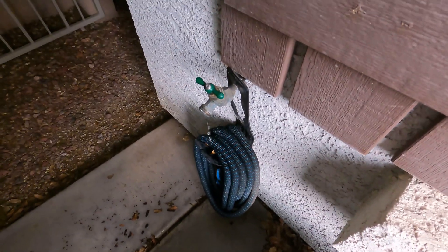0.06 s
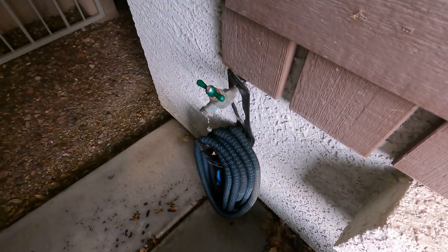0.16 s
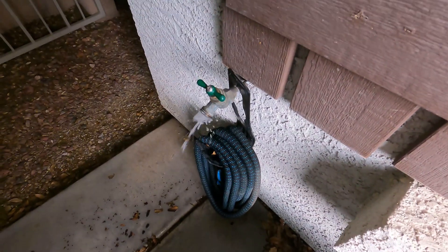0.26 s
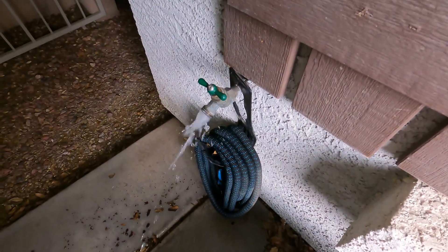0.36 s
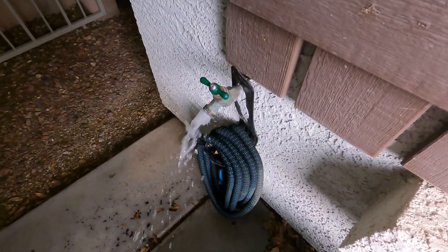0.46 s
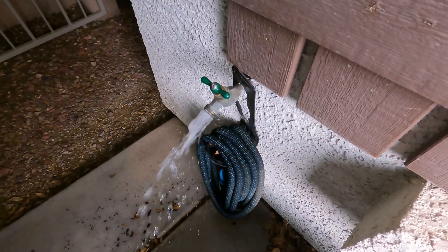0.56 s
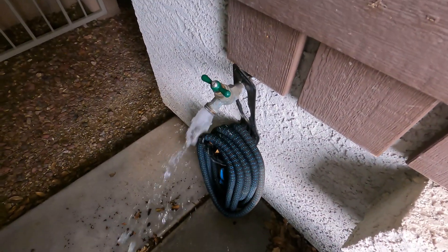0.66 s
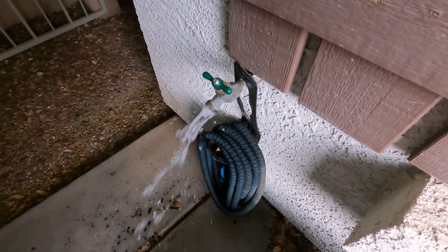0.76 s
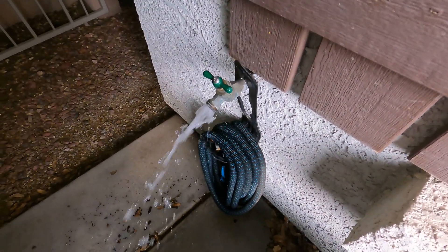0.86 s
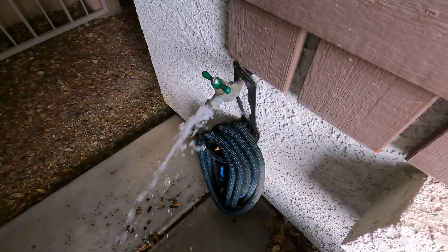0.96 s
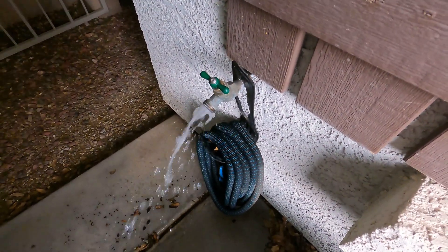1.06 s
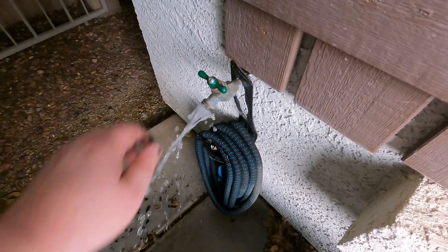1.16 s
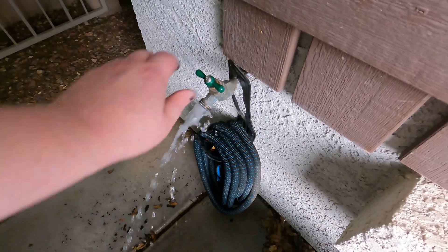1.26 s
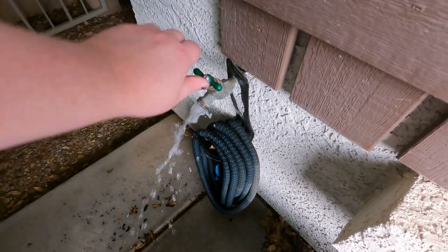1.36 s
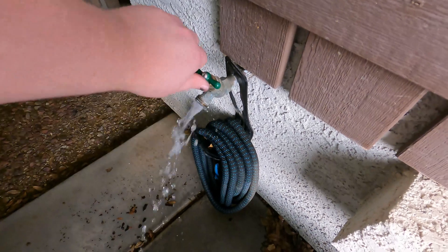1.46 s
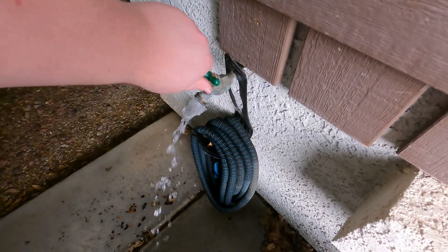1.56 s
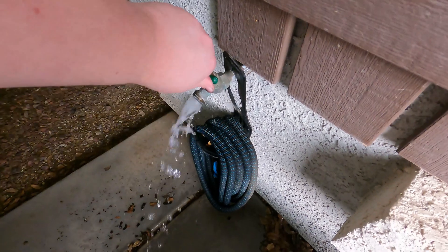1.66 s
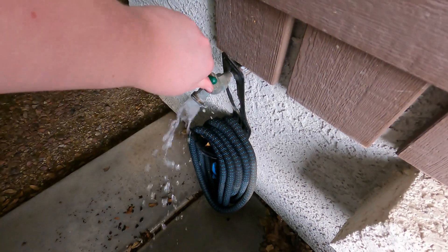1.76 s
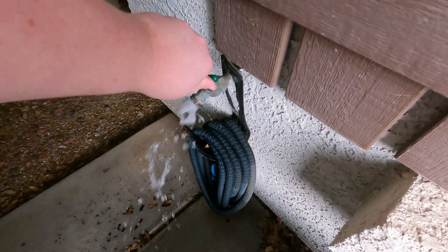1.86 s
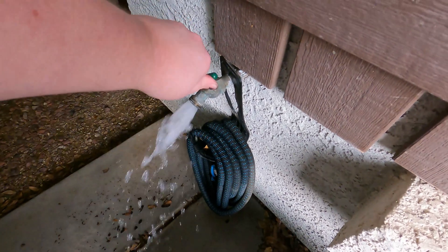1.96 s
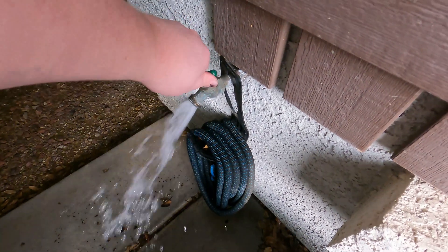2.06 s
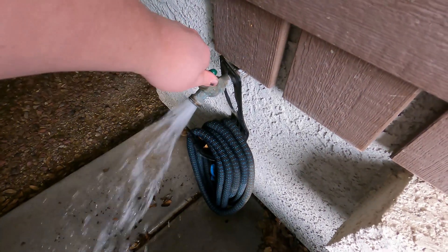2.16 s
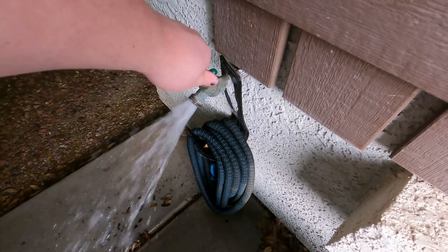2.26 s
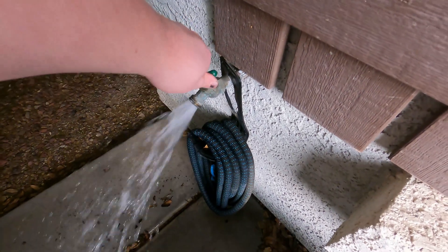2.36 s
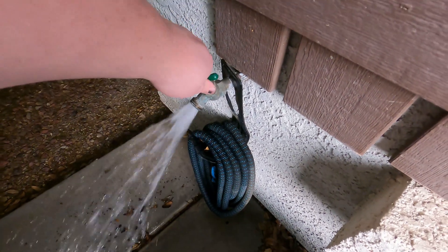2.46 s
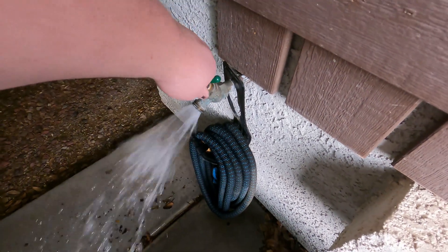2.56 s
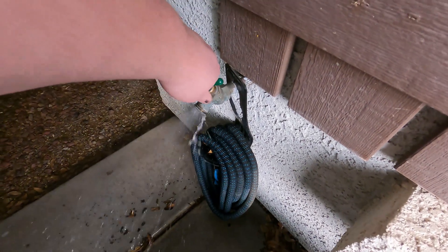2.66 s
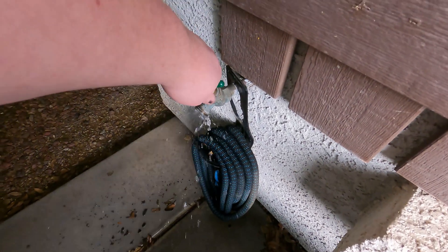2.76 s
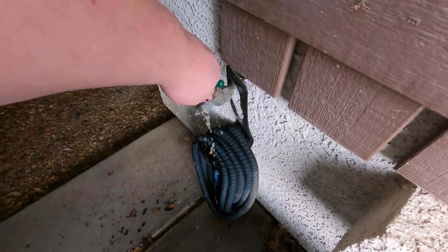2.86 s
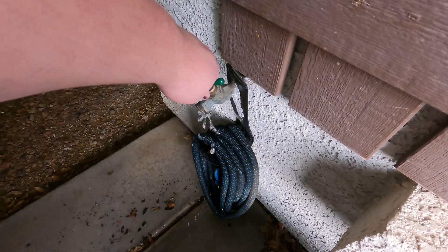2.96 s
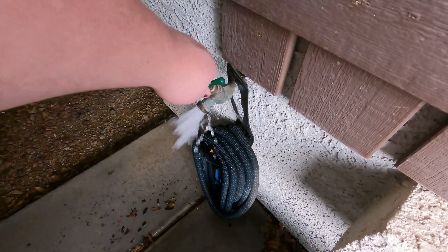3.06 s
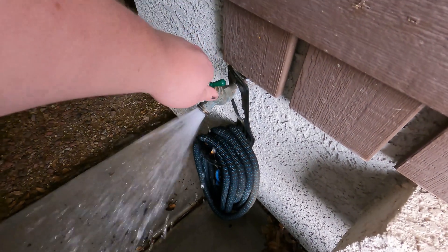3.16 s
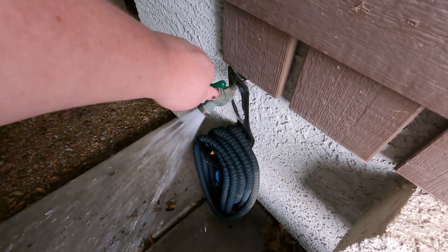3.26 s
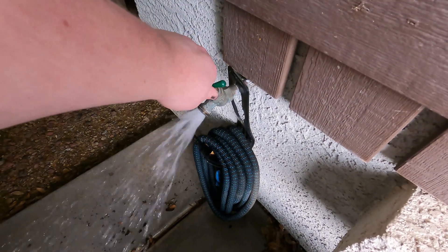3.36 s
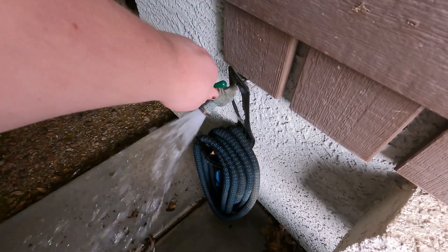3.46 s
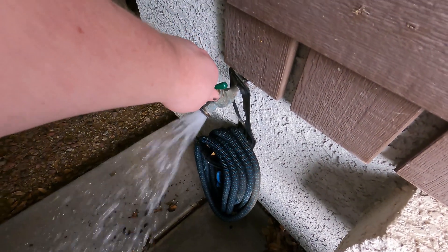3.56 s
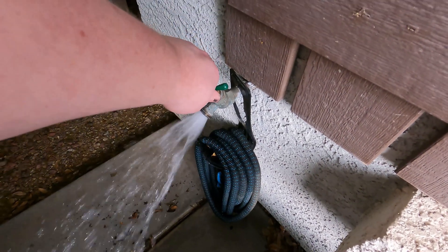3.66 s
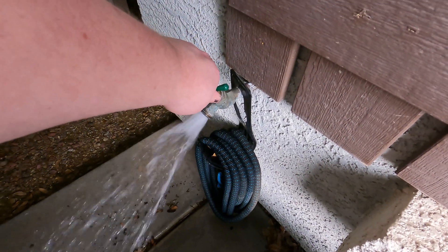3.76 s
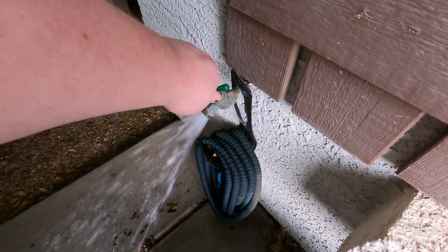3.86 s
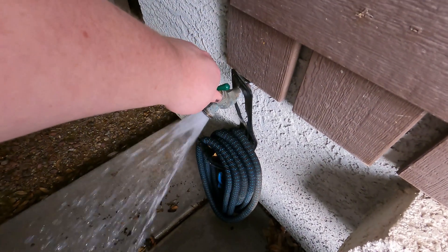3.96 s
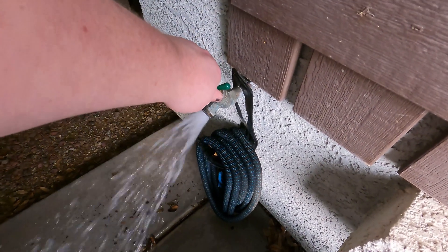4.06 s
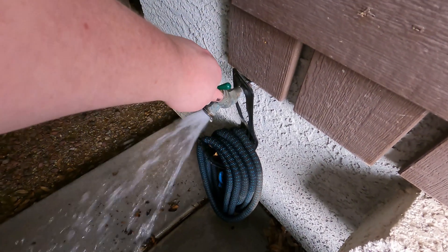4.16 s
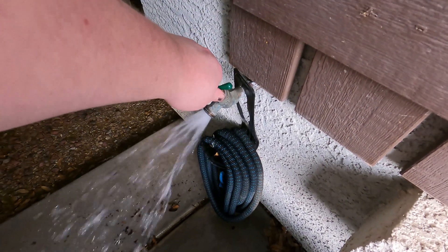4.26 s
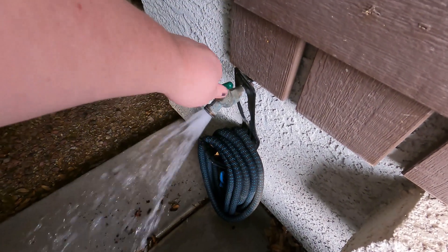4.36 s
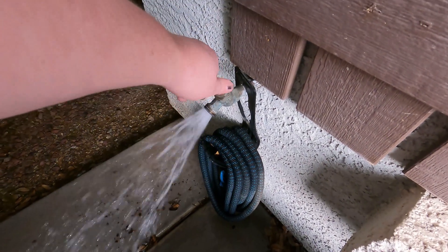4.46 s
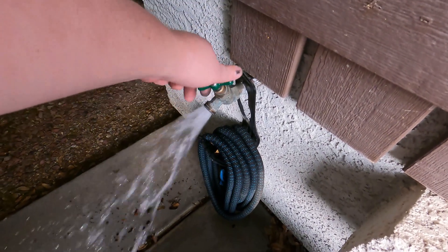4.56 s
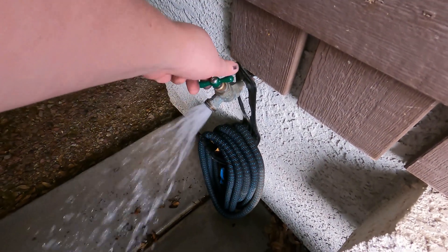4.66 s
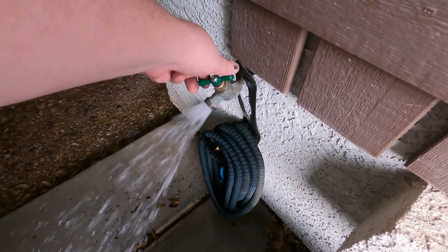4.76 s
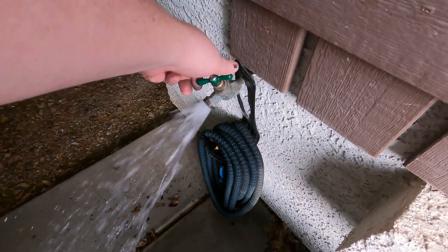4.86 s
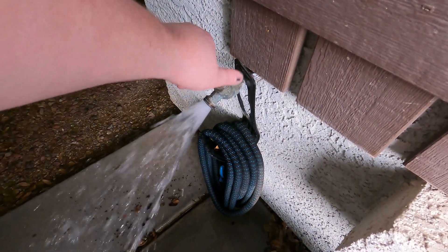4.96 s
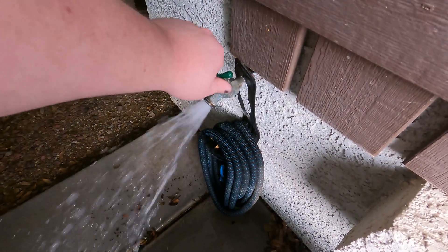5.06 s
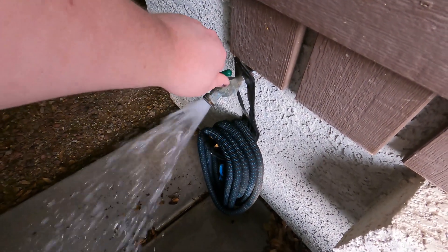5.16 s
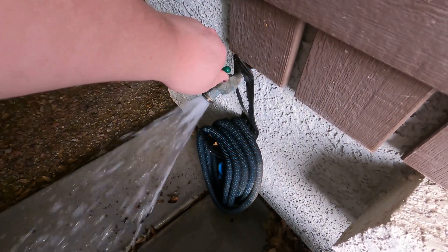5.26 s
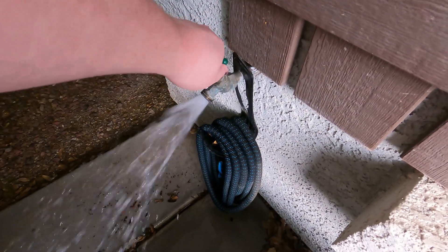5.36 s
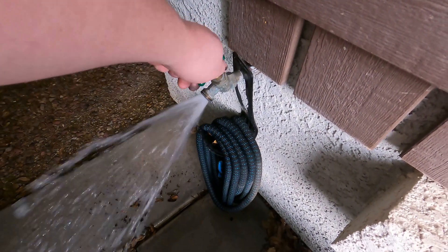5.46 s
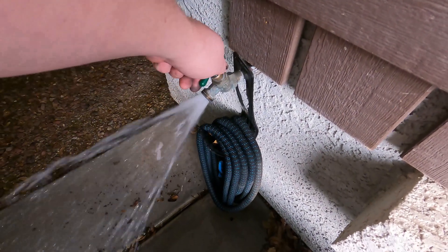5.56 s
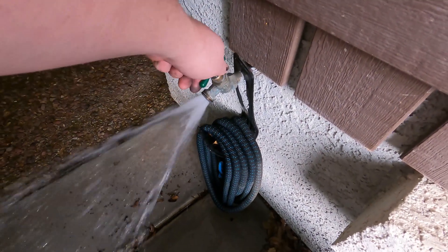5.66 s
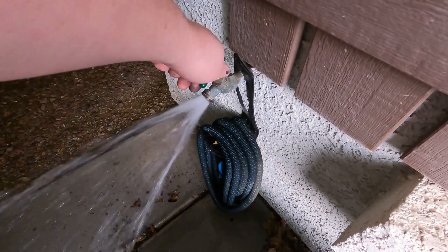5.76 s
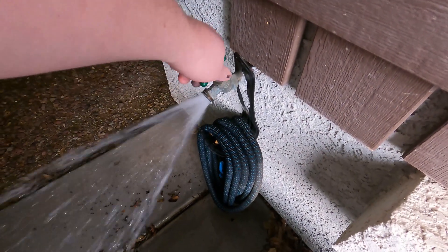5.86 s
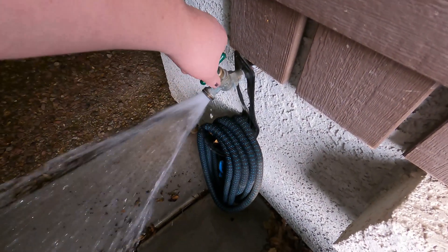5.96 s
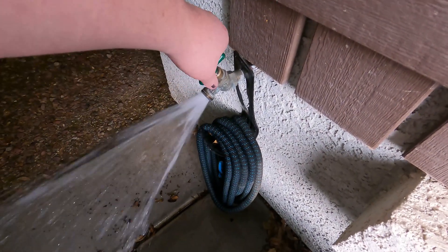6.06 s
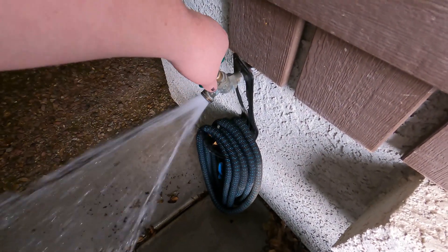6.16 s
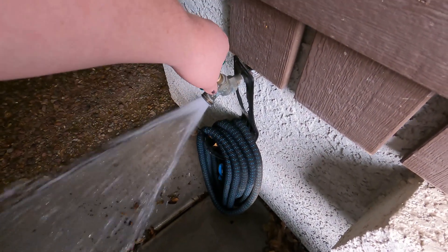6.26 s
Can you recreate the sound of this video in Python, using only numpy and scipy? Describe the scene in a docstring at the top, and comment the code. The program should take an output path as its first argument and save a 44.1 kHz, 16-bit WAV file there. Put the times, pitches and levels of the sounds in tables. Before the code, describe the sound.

An outdoor spigot hisses air, spits and pops water onto concrete, gushes, sputters once more, then settles into a strong splashing jet.

```python
"""Water from an outdoor hose spigot dribbles, gushes and then jets into a corner of stucco walls.
Its crackle is filtered noise in tiny puffs with ringing bubbles; drops patter on the slab after their flight.
Air still in the pipe hisses and sputters out in two blasts, before the dribble and again after the gush.
Between them air pockets pop, slugs of water glug and thud, and big drops slap the concrete.
The corner adds resonances and short stereo echoes; a low outdoor rumble lies underneath."""
import sys
import numpy as np
from scipy import signal
from scipy.fft import rfft, irfft
from scipy.io import wavfile
from scipy.ndimage import uniform_filter1d

SR = 44100
rng = np.random.default_rng(int(sys.argv[2]) if len(sys.argv) > 2 else 0)


def transcribe(u):
    """Save the signal u as a 16-bit wav file named by the first command-line argument.

    u: samples, shape (n,) or (channels, n), limited to [-1, 1]; the rate is SR.
    q: integer samples, one column per channel.
    """
    v = np.clip(np.atleast_2d(u).T, -1, 1)
    q = np.round(v * 32767).astype(np.int16)
    wavfile.write(sys.argv[1], SR, q)


N = 278843
TIME = np.arange(N) / SR
GRID_HZ = np.maximum(np.fft.rfftfreq(4096, 1 / SR), 1)   # frequencies at which filters are drawn


def from_db(db):
    """Turn decibels into a gain."""
    return 10 ** (np.asarray(db) / 20)


def rms_one(x):
    """Scale a sound to an average (rms) level of 1."""
    return x / np.sqrt(np.mean(x ** 2) + 1e-20)


def over(sound, length_s):
    """Scale a short sound to the energy of rms 1 held for this length."""
    return sound / np.sqrt(np.sum(sound ** 2) / (length_s * SR))


def in_time(rows):
    """Read the columns of a time table at every sample, with straight lines between rows."""
    start_s, *columns = np.transpose(rows)
    return np.array([np.interp(TIME, start_s, column) for column in columns])


def stretch(rows, rise_s, fall_s):
    """Gains of a dB curve that fades in before its first row and out after its last."""
    before = np.maximum(rows[0][0] - TIME, 0) / rise_s
    after = np.maximum(TIME - rows[-1][0], 0) / fall_s
    return from_db(in_time(rows)) * np.exp(-(before + after))


def shape(points):
    """Draw a spectrum in dB from a few (pitch_hz, level_db) points."""
    hz, db = np.transpose(points)
    return np.interp(np.log(GRID_HZ), np.log(hz), db)


def bumps(rows):
    """Draw resonant peaks and dips in dB from rows of (pitch_hz, width_hz, level_db)."""
    return sum(db / (1 + ((GRID_HZ - hz) / width) ** 2) ** 2 for hz, width, db in rows)


def colour(x, db):
    """Filter a sound with the given dB response, never ringing ahead of it (minimum phase)."""
    cepstrum = irfft(np.log(from_db(db)))
    half = len(cepstrum) // 2
    # fold the backward half onto the forward half
    cepstrum[1:half] *= 2
    cepstrum[half + 1:] = 0
    impulse = irfft(np.exp(rfft(cepstrum)))
    return signal.oaconvolve(x, impulse)[:len(x)]


def drift(rate_hz):
    """Slow random wandering with rms 1: noise smoothed twice, made at every 40th sample."""
    r = np.exp(-2 * np.pi * rate_hz * 40 / SR)
    noise = rng.standard_normal(N // 40 + 2002)
    slow = signal.lfilter([1], [1, -2 * r, r * r], noise)[2000:]
    return np.interp(np.arange(N) / 40, np.arange(len(slow)), rms_one(slow))


def grains(per_s, spread_db, clump_db, smooth):
    """Random clicks of uneven size, in clumps, over fine noise; the mean level is held steady."""
    born = rng.random(N) < per_s / SR
    sizes = from_db(spread_db * np.minimum(rng.exponential(1, N), 3.7)) * rng.choice([-1, 1], N)
    clicks = rms_one(born * sizes / np.sqrt(per_s)) + smooth * rng.standard_normal(N)
    clicks = clicks * from_db(clump_db * drift(41))
    return clicks / np.sqrt(uniform_filter1d(clicks ** 2, size=4000) + 1e-9)


def puffs(clicks, swell_s):
    """Each click becomes a tiny puff of noise that swells and fades."""
    t = np.arange(-256, 257) / SR
    power = signal.oaconvolve(clicks ** 2, np.exp(-(t / swell_s) ** 2), "same")
    return np.sqrt(np.abs(power)) * rng.standard_normal(N)


def add(track, start_s, sound):
    """Mix a sound into the track at its start time."""
    i = max(int(start_s * SR), 0)
    track[i:i + len(sound)] += sound[:N - i]


# how far scattered sound differs between the two sides: pitch_hz, side_minus_mid_db
WIDTH = [(100, -22.5), (1000, -13.5), (2600, -14), (5000, -13), (8000, -4.5), (13000, -4.5)]


def wide(x, db):
    """A coloured stereo source: both sides share each grain's timing, but not its fine detail."""
    mid = colour(x, db)
    loudness = np.sqrt(np.abs(uniform_filter1d(x ** 2, size=48)))
    side = colour(loudness * rng.standard_normal(N), db + shape(WIDTH))
    return (mid + side * [[1], [-1]]) / np.sqrt(np.mean(mid ** 2))


# tone of the outdoor rumble: pitch_hz, relative_level_db
RUMBLE_TONE = [(15, -25), (30, -25), (48, 0), (59, 2.5), (72, 1.5), (100, 0), (150, -10.5), (300, -21),
               (900, -19), (4000, -64)]
# loudness of the outdoor rumble: start_s, level_db
RUMBLE_LEVEL = [(0, -34.5), (1.2, -39.5), (3, -37), (3.6, -45.5), (6.3, -43.5)]


def outdoor_rumble():
    """Noise filtered down to the deep bass, with a slowly changing level."""
    return from_db(in_time(RUMBLE_LEVEL)) * wide(rng.standard_normal(N), shape(RUMBLE_TONE))


# peaks and dips of the wall corner: pitch_hz, width_hz, level_db
CORNER = [(138, 15, 2), (267, 43, -5.5), (314, 19, 0.5), (390, 16, 0.5), (495, 89, -6), (648, 86, 4),
          (822, 118, -11.5), (932, 38, 7), (1225, 22, 4), (1269, 34, 6.5), (1390, 23, 5), (1344, 6.2, 10.5),
          (1560, 24, 7), (1645, 41, -2), (1750, 57, 1), (1930, 12, 5), (2040, 35, -9.5), (2293, 18, 5),
          (2630, 110, -4), (2727, 86, 2.5), (3130, 32, 2.5), (3320, 26, -13), (3782, 61, 6), (3950, 45, -4),
          (4510, 71, 6.5)]
# the left side is a little brighter: pitch_hz, left_minus_right_db
BALANCE = [(300, -0.5), (1000, 0.8), (2500, 0), (5000, 1.5), (8500, 3.5), (13000, 0.7)]
# sound scattered back by walls and slab, relative to the direct sound: pitch_hz, level_db
REFLECTED = [(100, -16), (700, -14), (2000, -11), (4500, -12), (8000, -13), (15000, -14)]


def corner(stereo):
    """Close walls colour the sound and scatter it back differently to each side."""
    t, sides = TIME[:12000], []
    near_t60_s, far_t60_s, far_db = .035, .2, -16   # t60: time to fade by 60 dB
    decay = from_db(-60 * t / near_t60_s) + from_db(far_db - 60 * t / far_t60_s)
    decay = decay * (t > .0007)   # the first echoes come just after the direct sound
    for x, sign in zip(stereo, (1, -1)):
        direct = colour(x, bumps(CORNER) + sign * shape(BALANCE) / 2)
        echoes = rng.standard_normal(len(t)) * decay
        echoes = echoes / np.linalg.norm(echoes)
        reflected = signal.oaconvolve(colour(direct, shape(REFLECTED)), echoes)[:N]
        sides.append(direct + reflected)
    return np.array(sides)


# big drops slapping the concrete: start_s, relative_level_db
SLAPS = [(0.7667, -17), (0.8714, -12), (0.9268, -18.5), (0.9816, -17), (1.0714, -17), (1.2032, -14),
         (1.2415, -12.5), (1.2544, -13.5), (1.272, -14), (1.3204, -23), (1.3293, -15), (1.5584, -19),
         (1.5798, -17.5), (1.5948, -16), (1.6137, -15.5), (1.7399, -13), (1.7823, -18), (1.8282, -19),
         (2.0123, -14)]
# tone of a slap: pitch_hz, relative_level_db
SLAP_TONE = [(300, -24), (1800, -14), (2600, -3), (4500, 0), (7300, -2), (9000, -14), (12000, -23),
             (15000, -44)]


def slaps():
    """A drop lands with a sharp crack and a small splash, both fading bursts of noise."""
    out, t = np.zeros(N), TIME[:2048]
    crack_s, splash_s, splash_db = .0007, .005, -8   # fading times; splash relative to crack
    envelope = np.exp(-t / crack_s) + from_db(splash_db) * np.exp(-t / splash_s)
    for start_s, db in SLAPS:
        slap = colour(rng.standard_normal(len(t)) * envelope, shape(SLAP_TONE))
        add(out, start_s, from_db(db + 0.5) * over(slap, crack_s))
    return out


def glug(length_s, hz, sharpness=3.5, skirt_db=-17, top_hz=1700):
    """A rough burst of flow drives a damped cavity, which rings around one pitch."""
    t = TIME[:8192]
    flow = rng.standard_normal(len(t)) * np.exp(-(t / length_s) ** 2) * np.sqrt(t / length_s)
    cavity = 1 / (1 + (sharpness * (GRID_HZ / hz - hz / GRID_HZ)) ** 2) + from_db(skirt_db) ** 2
    band = 1 / (1 + (GRID_HZ / top_hz) ** 6) / (1 + (80 / GRID_HZ) ** 4)   # cuts treble and deepest bass
    return over(colour(flow, 10 * np.log10(cavity * band)), length_s)


# heavy slugs of water forced through the valve:
# start_s, length_s, relative_thud_db, relative_knock_db
SLUGS = [(0.29, 0.022, -16.5, -23), (0.384, 0.029, -26.5, -31), (0.63, 0.043, -19, -29.5),
         (.678, 0.0049, -31, -12), (1.482, 0.029, -30, -32.5), (1.854, 0.07, -23, -44),
         (1.894, 0.0096, -23, -16.5), (2.059, 0.0088, -16.5, -27), (2.642, 0.027, -17, -22.5),
         (3.163, 0.058, -22.5, -40)]


def slugs():
    """Every heavy slug drives two cavities: a low one thuds and a higher one knocks."""
    out = np.zeros(N)
    thud_hz, knock_hz, trim_db = 260, 1230, -3.5
    for start_s, length_s, thud_db, knock_db in SLUGS:
        thud = from_db(thud_db + trim_db) * glug(length_s, thud_hz, sharpness=0.5)
        knock = from_db(knock_db + trim_db) * glug(length_s, knock_hz)
        add(out, start_s, thud + knock)
    return out


# air pockets spit out of the spout: start_s, relative_pop_db, ring_hz, glug_db
SPITS = [(0.3882, -9.5, 2920, -31.5), (0.4374, -11.5, 2320, -30), (0.494, -10.5, 2760, -31.5),
         (0.5117, -10.5, 2470, -32), (0.5614, -10, 2400, -27), (0.5824, -12, 2170, -29),
         (0.5983, -11.5, 2400, -46), (0.6287, -10, 3050, -39), (0.664, -6.5, 2580, -36),
         (0.8051, -6, 3120, -28), (0.8824, -5, 2550, -41), (0.9824, -13, 2200, -31),
         (1.0647, -9, 2100, -34), (1.1418, -12.5, 2470, -38.5), (1.265, -13.5, 2430, -32),
         (1.3649, -12, 2540, -28.5), (1.3838, -20, 2430, -31.5), (1.473, -12, 2410, -30.5),
         (1.4957, -13.5, 2700, -34), (1.6462, -10, 2440, -32.5), (1.7383, -24, 2740, -34),
         (1.871, -9, 2800, -25.5), (1.8985, -4.5, 2080, -30), (1.9527, -9.5, 2940, -31.5),
         (2.0735, -9, 2840, -44), (2.1313, -8.5, 2950, -33), (3.0444, -11, 3150, -48),
         (3.2564, -9.5, 2890, -42)]


def closing_glugs():
    """Water closes behind every spit with a small glug."""
    out = np.zeros(N)
    for start_s, _, _, glug_db in SPITS:
        add(out, start_s, from_db(glug_db) * glug(length_s=0.022, hz=293))
    return out


def plops():
    """The big bubble left by a spit rings for some cycles and rises a little in pitch."""
    out, t = np.zeros(N), TIME[:8192]
    delay_s, t60_s, middle_hz = 0.01474, 0.17, 202
    rise_per_s = .8   # share of the starting pitch
    for (start_s, _, _, glug_db), size in zip(SPITS, rng.standard_normal(len(SPITS))):
        hz = middle_hz * np.exp(-0.11 * size)   # larger bubbles are lower
        fade = (1 - np.exp(-t / 0.001)) * from_db(glug_db + 2 - 60 * t / t60_s)
        add(out, start_s + delay_s, fade * np.sin(2 * np.pi * hz * t * (1 + rise_per_s * t / 2)))
    return out


# tone of a pop before its ring is added: pitch_hz, relative_level_db
POP_TONE = [(200, -22), (900, -17), (1800, -15), (2250, -2), (3200, 0), (4200, -5), (6000, -11),
            (8000, -24), (11000, -39), (15000, -58)]


def pops():
    """Each air pocket bursts in a short puff that rings the spout and trails off in fizz."""
    out, t = np.zeros(N), TIME[:4096]
    puff_s = .0035
    swell = np.exp(-(2 * t / puff_s - 1) ** 2 / 2)
    fizz = from_db(-15) * np.exp(-t / .008)
    softer_treble_db = -3 / (1 + (4000 / GRID_HZ) ** 8)
    for start_s, db, ring_hz, _ in SPITS:
        response = shape(POP_TONE) + bumps([(ring_hz, 470, 10)]) + softer_treble_db
        smaller_delay_s, smaller_db = rng.uniform(.0035, .0084), -10.5   # a smaller pocket follows
        for delay_s, pocket_db in [(0, 0), (smaller_delay_s, smaller_db)]:
            pop = colour(rng.standard_normal(len(t)) * (swell + fizz), response)
            add(out, start_s + delay_s, from_db(db + pocket_db - 5.5) * over(pop, puff_s))
    return out


def sputter(cavity, climb):
    """Air blows through a cavity in the water; its ring climbs as it narrows and drops as it bursts open."""
    gulps_per_s = 24 * from_db(3 * drift(13))   # the pace wanders
    closing = np.cumsum(gulps_per_s) / SR % 1   # rises from 0 to 1 in every gulp
    ring_hz = in_time(cavity)[0] * (1 + climb * (closing - .5) + .03 * drift(35.3))
    phase = 2 * np.pi * np.cumsum(ring_hz) / SR
    # slow noise makes the ring and its overtone unsteady
    narrow = signal.butter(2, 230, fs=SR, output="sos")
    noise = rng.standard_normal((2, N)) + 1j * rng.standard_normal((2, N))
    swing = signal.sosfilt(narrow, noise)
    ring = swing[0] * np.exp(1j * phase) + from_db(-15) * swing[1] * np.exp(2j * phase)
    return rms_one(ring.real * from_db(1.4 * drift(53)))


# resonances of the air-filled spout: pitch_hz, width_hz, level_db
SPOUT = [(1760, 150, 2.4), (3750, 110, 3.5), (4200, 100, 2), (5900, 200, 3.5), (6700, 160, 2.6),
         (11950, 250, 3)]
# tone of the low churning of the water: pitch_hz, relative_level_db
CHURN = [(60, -44), (130, -1.5), (200, 5), (380, 2), (650, 1.5), (900, -16), (2000, -53), (5000, -69)]


def air(blast, tone, cavity, hiss_flutter_db, climb):
    """Trapped air rushes through the resonances of the spout and drags water with it."""
    hiss, spit = stretch(blast, rise_s=0.0073, fall_s=0.016)
    ring = sputter(cavity, climb)
    gurgle = rms_one(colour(grains(600, spread_db=2.0, clump_db=2.5, smooth=.3), shape(CHURN)))
    noise = rng.standard_normal(N) * from_db(hiss_flutter_db * drift(39))
    rush = wide(noise, shape(tone) + bumps(SPOUT))
    return hiss * rush + spit * (ring + from_db(-11) * gurgle)


# escaping air, with the sputter of water it carries along: start_s, hiss_db, sputter_db
FIRST_AIR = [(0, -21, -32), (.28, -22, -42), (.305, -20.5, -17), (.345, -23, -15.5)]
SECOND_AIR = [(2.66, -21, -14.5), (2.71, -18, -17.5), (2.78, -18.5, -19.5), (3.075, -19.5, -27.5),
              (3.105, -20.5, -15)]
# tone of the hiss before the spout resonances: pitch_hz, relative_level_db
FIRST_RUSH = [(300, -20), (800, -13.5), (1250, -12), (1750, -1), (2200, -4.5), (2900, 2.5), (3400, -4),
              (4100, -1), (5100, -11.5), (6000, -9), (6800, -9), (8000, -17), (10800, -25.5),
              (12100, -21.5), (13000, -27), (15500, -39)]
SECOND_RUSH = [(300, -31), (800, -5.5), (1250, -3), (1900, -3.5), (2400, 5.5), (3800, 1.5), (5100, -3),
               (6000, -1.5), (6900, -6), (8000, -14.5), (10300, -21), (11900, -16), (13300, -27),
               (15500, -51)]
# middle pitch of the cavity that air opens in the wet spout: start_s, ring_hz
FIRST_CAVITY = [(.3, 3170), (0.349, 2876)]
SECOND_CAVITY = [(2.66, 2810), (2.786, 3170), (2.862, 3110), (2.894, 2904), (2.978, 3466), (3.016, 3000),
                 (3.064, 3160), (3.11, 2847)]


def air_blasts():
    """Air escapes twice; the pitch of the second sputter climbs further in each gulp."""
    first = air(FIRST_AIR, FIRST_RUSH, FIRST_CAVITY, hiss_flutter_db=0.55, climb=0.053)
    second = air(SECOND_AIR, SECOND_RUSH, SECOND_CAVITY, hiss_flutter_db=.9, climb=.28)
    return first + second


# tone of drops landing on the slab: pitch_hz, relative_level_db
SPRAY = [(700, -12), (2000, 12.5), (3500, -9.5), (4600, -2), (5500, 0), (7000, -1.5), (8300, -7.5),
         (10000, -12), (12200, -15), (13500, -16), (15500, -63)]


def patter(per_s):
    """Drops of four sizes land independently; smaller ones tick brighter, the smallest almost as mist."""
    out = 0
    for hz, mist in [(3600, .3), (5200, .25), (7200, .3), (10500, .7)]:
        size_band = 10 * np.log10(.01 + np.exp(-(np.log2(GRID_HZ / hz) / .32) ** 2))
        db = shape(SPRAY) + size_band
        share = np.sqrt(np.sum(from_db(db) ** 2) / np.sum(from_db(shape(SPRAY)) ** 2))
        out = out + share * wide(grains(per_s, spread_db=4.2, clump_db=1.9, smooth=mist), db)
    return out


# tone of the crackle of a closed stream: pitch_hz, relative_level_db
CRACKLE = [(900, -23.5), (1750, -9), (2000, -3), (2250, -2.5), (2550, 0.5), (3050, 2), (3350, -3),
           (3800, -5), (4300, -9), (6000, -23.5), (9000, -63), (15000, -46)]


def bubbles(per_s):
    """Single bubbles ring for a few cycles, each at one of six pitches set by its size."""
    out = 0
    for hz in np.geomspace(2250, 3250, 6):
        ring = -10 * np.log10(1 + ((GRID_HZ - hz) / 100) ** 2)
        clicks = grains(per_s / 6, spread_db=3.0, clump_db=0.0, smooth=.02)
        out = out + rms_one(colour(clicks, ring + shape(CRACKLE)))
    return rms_one(out)


# the water runs three times: start_s, relative_crackle_db, relative_hollow_body_db
DRIBBLE = [(0.36, -29, -46), (0.8, -27, -37.5), (1.3, -30, -44), (1.8, -29, -41.5), (1.99, -24.5, -48)]
GUSH = [(2.04, -23.5, -24), (2.078, -20, -26), (2.612, -19, -37.5), (2.66, -16.5, -24)]
JET = [(3.17, -20, -27.5), (3.7, -20.5, -27), (4.25, -19, -35), (4.5, -19.5, -25), (4.85, -18.5, -27),
       (5.1, -19, -34), (6.0, -18.5, -33), (6.08, -16, -28), (6.32, -19, -40)]
# break-up of the stream, with the jet's share that fans out (0 to 1):
# start_s, burst_clicks_per_s, reference_drops_per_s, fan_share
BREAKUP = [(.4, 870, 490, 0.9), (1.8, 490, 370, 0.54), (2.3, 2100, 1300, 0), (5.2, 1500, 1200, 0.02),
           (5.6, 1830, 4100, 0.85), (6.3, 2600, 4900, 0.86)]
# tones of a fanned jet's crackle, the hollow body and the fine fizz: pitch_hz, relative_level_db
FANNED = [(900, -24), (1550, -14), (1850, -2), (2050, -3.5), (2270, 4.5), (2550, 0.5), (3050, 1),
          (3350, -2.5), (3800, -3), (4600, -6.5), (5300, -6.5), (6200, -48), (9000, -45), (15000, -46)]
BODY = [(500, -15.5), (800, -4), (930, -1.5), (1300, -6), (1850, 1), (2200, -13.5), (3000, -1.5),
        (6000, -58)]
FIZZ = [(2500, -12.5), (3800, 0), (4600, -2), (5900, -3), (7000, -5.5), (10000, -21), (15000, -50)]
# a thin dribble has no big bubbles, so its sound below 2 kHz is weaker, and its drops tick a little brighter:
# pitch_hz, level_db
THIN = [(1000, -11), (1900, -6), (2200, -1), (4500, 0.5), (7500, 3), (10000, 1)]


def water():
    """Bubbles burst as the stream leaves the spout; after their flight its drops patter on the slab."""
    crackle = body = spray = churn = 0
    start_s, stop_s, spray_build_s = 0.051, 0.013, .04   # fading times of a run and its spray
    # flight time to the slab in s, spray relative to crackle in dB, settled churn in dB
    runs = [(DRIBBLE, 0.376, -7.5, -15.5), (GUSH, 0.255, -7.5, -26.5), (JET, 0.24, -9, -21.5)]
    for curve, flight_s, spray_db, churn_db in runs:
        flow, hollowness = stretch(curve, start_s, stop_s)
        landing, _ = stretch(np.array(curve) + [flight_s, 0, 0], spray_build_s, stop_s)
        # a fresh run churns more until its air has cleared
        aerated = np.exp(-np.maximum(TIME - curve[0][0], 0) / 0.23)
        crackle = crackle + flow
        body = body + hollowness
        # some drops hit the wall and hose at once
        spray = spray + from_db(spray_db) * landing + from_db(-18) * flow
        churn = churn + from_db(churn_db + 16 * aerated) * np.sqrt(flow * hollowness)

    bursts_per_s, drops_per_s, fan = in_time(BREAKUP)
    clicks = grains(bursts_per_s, spread_db=3.0, clump_db=1.2, smooth=.3)
    bursts = rms_one(puffs(clicks, swell_s=.0005))
    gurgle = grains(bursts_per_s, spread_db=4.0, clump_db=1.6, smooth=0.079)
    # a jet that fans out crackles over a broader range than a closed stream
    burst_sound = (1 - fan) * wide(bursts, shape(CRACKLE)) + fan * wide(bursts, shape(FANNED))
    ringing = bubbles(bursts_per_s / 2)
    spout = crackle * (from_db(-0.45) * burst_sound + from_db(-6.0) * ringing)
    # fanning out weakens the hollow body and strengthens the bass churn
    hollow = from_db(-4 * fan) * body * wide(0.78 * bursts + gurgle, shape(BODY))
    low = from_db(3 * fan) * churn * wide(gurgle, shape(CHURN))

    # large drops crack across the whole treble, small ones tick
    cracks = wide(grains(drops_per_s / 2, spread_db=3.7, clump_db=1.4, smooth=.35), shape(SPRAY))
    drops = from_db(-13.0) * cracks + from_db(-0.45) * patter(drops_per_s / 2)
    slab = spray * from_db(-fan) * drops   # a fanned jet throws its drops farther away
    fizz_noise = rng.standard_normal(N) * from_db(1.5 * drift(90))
    fizz = from_db(-15) * crackle * wide(fizz_noise, shape(FIZZ))
    splash = spout + fizz + slab

    # blend from the thin dribble to the full sound just before the gush
    dribbling = np.clip((GUSH[0][0] - TIME) / start_s, 0, 1)
    thin = np.array([colour(side, shape(THIN)) for side in splash])
    return dribbling * thin + (1 - dribbling) * splash + hollow + low


def scene():
    """Running water, two blasts of air and single spits in the corner, over the outdoor rumble."""
    spits = pops() + closing_glugs() + plops()
    sources = water() + air_blasts() + spits + slugs() + slaps()
    return corner(sources) + outdoor_rumble()


def record(dry):
    """The highest peaks are clipped flat and the top treble is cut."""
    low_pass = signal.cheby2(16, 60, 16050, fs=SR, output="sos")   # 60 dB down from 16050 Hz up
    return signal.sosfilt(low_pass, np.clip(dry, -.8, .8))


dry = scene()
out = record(dry)
transcribe(out)
```